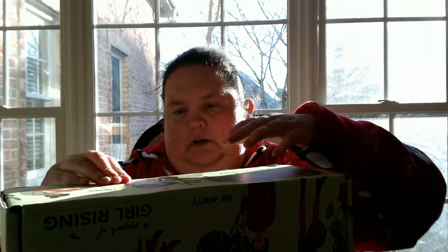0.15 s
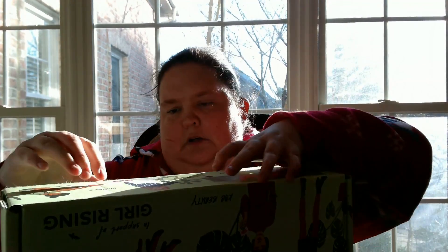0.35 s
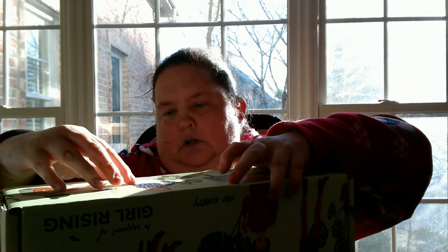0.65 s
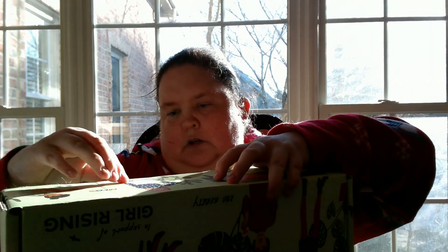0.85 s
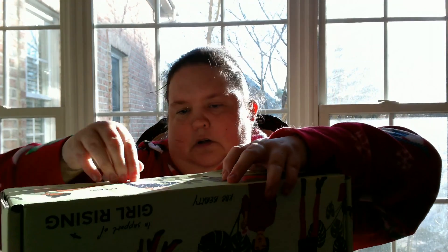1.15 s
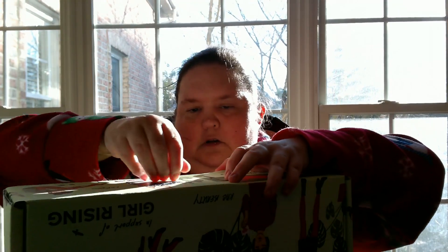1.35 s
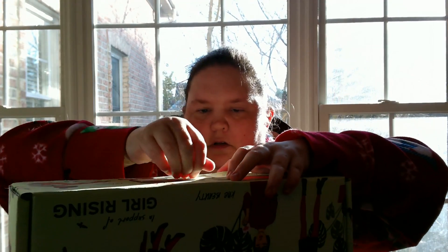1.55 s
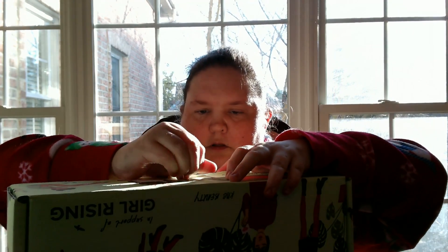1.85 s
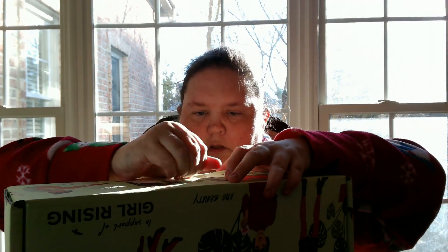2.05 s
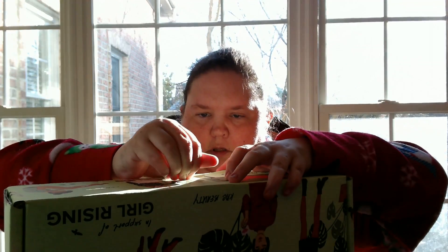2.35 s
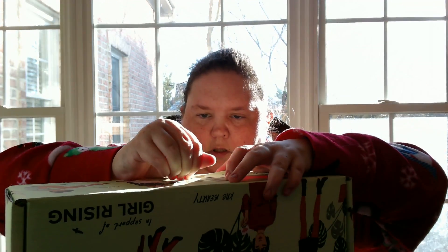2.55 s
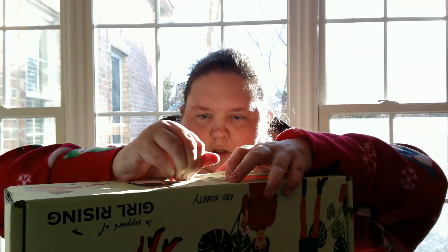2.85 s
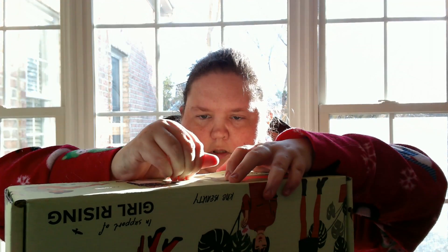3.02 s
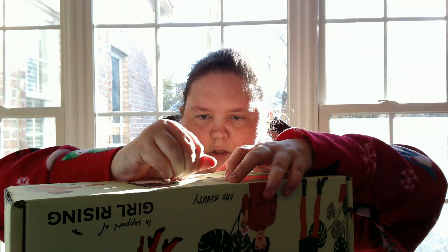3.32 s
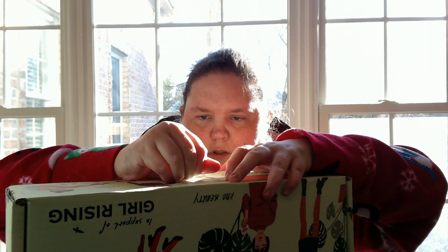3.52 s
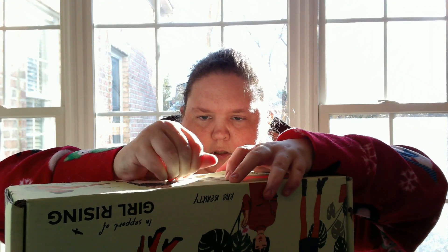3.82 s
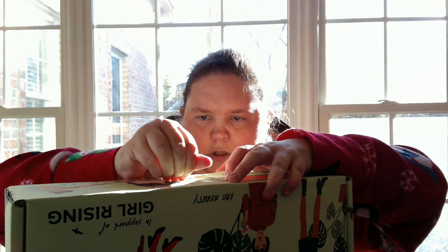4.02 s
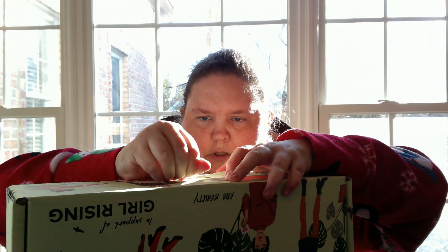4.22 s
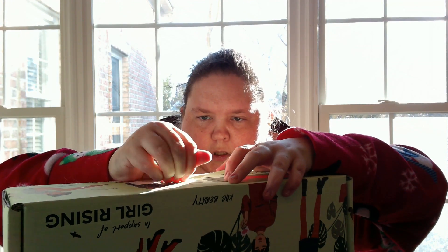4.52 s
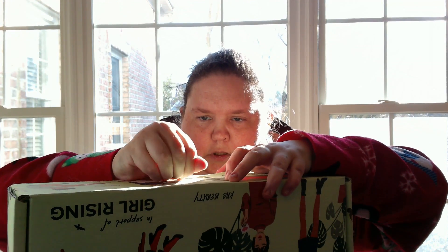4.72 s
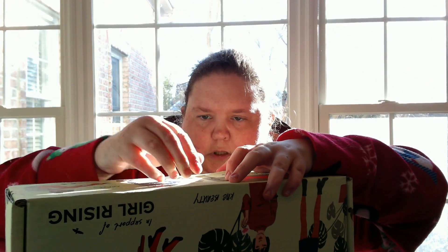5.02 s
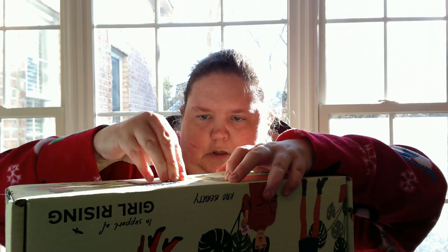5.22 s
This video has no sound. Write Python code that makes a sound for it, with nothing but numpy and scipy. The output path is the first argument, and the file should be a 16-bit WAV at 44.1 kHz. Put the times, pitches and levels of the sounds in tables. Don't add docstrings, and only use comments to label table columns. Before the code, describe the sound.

Hands work at tape on a cardboard carton in a quiet furnished room. Soft dry scrapes come first, then a sharp burst of clicks and snaps, then single hard slips knocking the hollow box, with short scratches between. Low table rumble and faint hiss lie beneath; a distant bird chirps briefly. Close stereo microphone, hands nearer the left side.

```python
import sys
import numpy as np
from scipy import signal
from scipy.fft import rfft, irfft
from scipy.io import wavfile
from scipy.ndimage import uniform_filter1d

SR = 44100
rng = np.random.default_rng(int(sys.argv[2]) if len(sys.argv) > 2 else 0)


def output_pcm(signal):
    pcm = np.clip(np.atleast_2d(signal).T, -1, 1) * 32767
    wavfile.write(sys.argv[1], SR, np.round(pcm).astype(np.int16))


def amplitude_ratio(level_db):
    exponent = np.asarray(level_db, float) / 20
    return 10 ** exponent


N = 237166


def evened(x):
    return x / np.sqrt(np.mean(x ** 2) + 1e-20)


def read(points, hz):
    f, value = np.transpose(points)
    return np.interp(np.log(hz + 1), np.log(f + 1), value)


def curves(rows):
    s, *columns = np.transpose(rows)
    return [np.interp(np.arange(N) / SR, s, c) for c in columns]


def add(mix, s, sound):
    part = mix[..., round(s * SR):][..., :sound.shape[-1]]
    part += sound[..., :part.shape[-1]]


def coloured(x, points):
    gain = amplitude_ratio(read(points, np.fft.rfftfreq(x.shape[-1], 1 / SR)))
    return irfft(rfft(x) * gain, x.shape[-1])


def resonate(x, hz, width_hz):
    turn = np.exp(2j * np.pi * np.cumsum(hz * np.ones(len(x))) / SR)
    r = np.exp(-np.pi * width_hz / SR)
    return 2 * (turn * signal.lfilter([1 - r], [1, -r], x / turn)).real


def flicker(size, depth_db):
    drift = uniform_filter1d(uniform_filter1d(rng.standard_normal(N), size), size)
    return amplitude_ratio(depth_db * evened(drift))


def air():
    # (frequency [Hz], level per Hz [dB])
    tone = [(60, -51), (100, 8.5), (190, -6), (300, -3), (450, -8), (900, -10.5), (1400, -14.5), (2000, -9),
            (2900, -10.5), (3500, -15.5), (4300, -16), (6000, -16), (9000, -20), (16500, -27)]
    # (frequency [Hz], correlation [-1 to 1])
    likeness = [(60, 0.19), (180, 0.93), (550, 0.6), (1650, 0.55), (4970, 0.17), (15000, -0.63)]
    # (frequency [Hz], left over right [dB])
    lean = [(60, 2), (200, -5.5), (450, -4), (900, -5.5), (1500, -7), (2200, -7), (2900, -13), (3800, -3.5),
            (5500, -9.5), (8000, -12.5), (10500, 2.5), (15000, -6)]
    level_db, patch_db = -51.5, 1.22
    frames, hz = N // 256 + 5, np.fft.rfftfreq(1024, 1 / SR)
    a, b, c, d, patches = rng.standard_normal((frames, 513, 5)).T
    patches = uniform_filter1d(patches, size=12, axis=0)
    patches = evened(uniform_filter1d(patches, size=12, axis=1))
    same = np.clip(read(likeness, hz), -1, 1)[:, None]
    left = a + 1j * b
    right = same * left + np.sqrt(1 - same ** 2) * (c + 1j * d)
    z = np.array([left, right]) * amplitude_ratio(read(tone, hz)[:, None] + patch_db * patches)
    z *= amplitude_ratio(np.multiply.outer([.5, -.5], read(lean, hz)))[..., None]
    return amplitude_ratio(level_db) * evened(signal.istft(z, nperseg=1024, noverlap=768)[1][:, :N])


def table():
    # (time [s], sway level [dB])
    weight = [(0.0, -51.5), (0.6, -54), (1.56, -53.5), (1.95, -48.5), (2.25, -53), (2.37, -44.5),
              (2.96, -44.5), (3.5, -49), (3.65, -54), (3.9, -51.5), (4.13, -47), (4.33, -48.5), (4.69, -52),
              (4.91, -53.5), (5.38, -52.5)]
    sway_hz, sway_from_db, rumble_db = 30.6, -56.5, -62
    jolt_s, jolt_db, jolt_hz, jolt_t60_s = 2.322, -21.5, 22.9, 0.17
    sway_db = curves(weight)[0]
    noise = rng.standard_normal((3, N))
    steady = np.sqrt(2) * np.sin(2 * np.pi * sway_hz * np.arange(N) / SR)
    waver = evened(resonate(resonate(noise[0], 21.6, 16), 21.6, 16))
    sway = np.clip((sway_db - sway_from_db) / 9, 0, 1) * steady + 0.57 * waver
    colour = [(35, -25), (55, 18.5), (120, 5), (170, -25.5)]
    rumble = [evened(coloured(noise[1] + 0.5 * side * noise[2], colour)) for side in (1, -1)]
    t = np.maximum(np.arange(N) / SR - jolt_s, 0)
    jolt = -amplitude_ratio(jolt_db - 60 * t / jolt_t60_s) * np.sin(2 * np.pi * jolt_hz * t)
    jolt *= np.minimum(t / 0.02, 1)
    return (jolt + sway * amplitude_ratio(sway_db) + np.array(rumble) * amplitude_ratio(rumble_db)) * amplitude_ratio([[.4], [-.4]])


def bird():
    # (time [s], level [dB])
    trill = [
        (3.95, -68),
        (3.968, -56),
        (3.99, -57),
        (4.028, -47),
        (4.075, -53.5),
        (4.13, -57),
        (4.16, -63),
        (4.27, -67),
    ]
    t = np.arange(N) / SR
    throb = (1 + .7 * np.cos(2 * np.pi * 40.5 * (t - 4.03))) * flicker(size=250, depth_db=2.5)
    sings = (t > trill[0][0]) & (t < trill[-1][0])
    waver_hz = 34 * evened(uniform_filter1d(rng.standard_normal(N), size=300))
    pitch_hz = 3010 - 120 * (t - 4.03) + waver_hz
    whistle = np.sqrt(2) * np.sin(2 * np.pi * np.cumsum(pitch_hz) / SR)
    return amplitude_ratio(curves(trill)[0] - 2.0) * sings * throb * whistle


def room(x):
    # (frequency [Hz], t60 [s])
    decay = [(150, 0.38), (500, 0.16), (2000, 0.24), (6000, 0.2), (10000, 0.19), (15000, 0.28)]
    # (frequency [Hz], likeness [0 to 1])
    likeness = [(100, 0.81), (400, 1), (1000, 0.51), (3000, 0.15)]
    first_wall_db = 5
    taps = np.zeros((2, SR // 2))
    at = np.arange(80, SR // 2 - 20, 20) + rng.integers(0, 20, (2, (SR // 2 - 81) // 20))
    np.put_along_axis(taps, at, rng.choice([-1., 1.], at.shape), 1)
    taps[:, :390] *= amplitude_ratio(-9)
    taps[:, [384, 397, 421]] = amplitude_ratio(first_wall_db) * np.array([1, -.8, .7])
    hz, t, z = signal.stft(taps, SR, nperseg=256)
    same = np.clip(read(likeness, hz), 0, 1)[:, None]
    z = np.array([z[0], same * z[0] + np.sqrt(1 - same ** 2) * z[1]])
    fade = amplitude_ratio(-60 * t / np.maximum(read(decay, hz), .02)[:, None])
    tail = signal.istft(z * fade, SR, nperseg=256)[1]
    tail /= np.linalg.norm(tail, axis=1, keepdims=True)
    return signal.fftconvolve(x[None], tail, axes=1)[:, :N]


def ports(x):
    # (frequency [Hz], loss [dB])
    shadow = [(100, 1.5), (400, 3), (1000, 7), (2000, 10), (3200, 13), (8000, 14), (15000, 17)]
    # (frequency [Hz], delay [samples])
    lag = [(100, 8.9), (400, 14), (1500, 5.1), (5000, 3.4)]
    hz = np.fft.rfftfreq(N, 1 / SR)
    far = amplitude_ratio(-read(shadow, hz)) * np.exp(-2j * np.pi * hz * read(lag, hz) / SR)
    return np.array([x, irfft(rfft(x) * far, N)])


def pressure():
    # (time [s], length [ms], hiss level [dB], press level [dB])
    strokes = [(0.005, 35, -55.5, -53.5), (1.082, 29, -56, -54), (1.462, 35.6, -45, -49),
               (1.54, 28, -50, -49), (1.706, 6.6, -58, -50), (2.175, 23, -56, -57.5),
               (2.325, 28, -56.5, -58), (2.386, 28, -52, -48), (2.444, 22, -55.5, -53),
               (2.81, 25, -52, -56), (2.911, 32, -60, -58), (3.028, 14, -60, -63),
               (3.302, 99, -63.5, -62.5), (3.542, 140, -73, -61), (3.961, 23, -54.5, -52),
               (4.081, 26, -67, -59.5), (4.462, 37, -48.5, -53), (4.555, 26, -56, -53),
               (4.59, 34, -45.5, -50), (4.626, 13, -52, -50.5), (4.64, 7, -43, -44),
               (4.655, 20, -56, -52.5), (4.977, 67, -62, -71), (5.073, 27, -47.5, -58),
               (5.271, 33, -63, -60.5)]
    # (time [s], length [ms], hiss level [dB])
    brushes = [(0.156, 48, -52), (0.25, 25, -53), (0.275, 34, -48), (0.32, 20, -52), (0.342, 32, -55),
               (0.5, 77, -56), (0.578, 71, -53.5), (0.686, 23, -55), (0.814, 24, -52), (0.975, 35, -52),
               (1.165, 43, -52.5), (1.201, 82, -51.5), (1.325, 91, -54), (1.65, 13, -53),
               (3.843, 23, -47.5), (4.73, 17, -60), (4.855, 11, -42.5), (5.154, 61, -50.5)]
    # (time [s], glide level [dB], press level [dB])
    rest = [(0.0, -56.5, -50.5), (0.96, -57, -56.5), (1.18, -61.5, -56), (1.35, -49.5, -47),
            (1.42, -52.5, -45.5), (1.62, -64, -49), (1.78, -66, -61), (1.95, -67, -42), (2.07, -59, -49),
            (2.5, -68, -54), (2.73, -63, -72), (2.86, -66, -44.5), (3.38, -71, -63), (3.86, -60.5, -47.5),
            (4.04, -67, -61.5), (4.31, -66, -49), (4.49, -63, -49.5), (5.38, -63.5, -54)]
    brush_hiss_db, brush_press_db, brush_airy_db = -0.5, -21.5, -1
    scratch_share, scratch_db, buzz_db, drone_db = 0.59, -4, 2, 3.5
    touches = [(*row, row[2] - 9.0) for row in strokes]
    for s, length_ms, db in brushes:
        touches.append((s, length_ms, db + brush_hiss_db, db + brush_press_db, db + brush_airy_db))
    power, ms = np.zeros((5, N)), np.arange(8000) * 1000 / SR
    for s, length_ms, hiss_db, press_db, airy_db in touches:
        mixed_db = scratch_db + scratch_share * press_db + (1 - scratch_share) * hiss_db
        levels_db = np.array([hiss_db, mixed_db, press_db + buzz_db, press_db + drone_db, airy_db])
        edge_ms = 2.2 + 0.1 * length_ms
        fade = np.exp(-np.maximum(ms - 4.0 - 0.92 * length_ms, 0) / edge_ms)
        shape = np.clip(ms / edge_ms, 0, 1) * fade
        add(power, max(s - .004, 0), amplitude_ratio(levels_db)[:, None] ** 2 * shape ** 2)
    glide, press = curves(rest)
    creep_db = np.array([glide - 1.5, glide - 11.5, press - 11.0, press - 8.5, glide - 3.5])
    return np.sqrt(power + amplitude_ratio(creep_db) ** 2)


def rubbing():
    # (frequency [Hz], level per Hz [dB])
    hiss_colour = [(3530, -8.5), (6000, -6.5), (8970, -3), (12000, -1), (14500, 1), (15800, 3.5),
                   (16200, -22), (16500, -26)]
    # (frequency [Hz], level per Hz [dB])
    airy_colour = [(9000, -34), (12000, -4), (13500, 2), (15500, 5), (16200, -18)]
    # (frequency [Hz], width [Hz], level [dB])
    skin = [(510, 25, 5.5), (836, 59, 1), (1056, 57, -9.5), (1680, 98, 2), (2880, 150, -10),
            (3680, 39, -39), (3940, 39, -14)]
    # (frequency [Hz], width [Hz], level [dB])
    hollow = [(248, 47, 0.5), (314, 60, 0.5), (429, 135, -7), (570, 50, -23)]
    scratch_colour = [(2200, -42), (3500, -2.0), (5500, 6.0), (8000, 4.0), (10000, -5.5), (14000, -13)]
    slips = rng.standard_normal((4, N)) * amplitude_ratio(np.minimum(rng.exponential(1, N), 5))
    hiss = evened(coloured(slips[0], hiss_colour)) * amplitude_ratio(4.5)
    scratch = evened(coloured(slips[1], scratch_colour)) * amplitude_ratio(1.5)
    airy = evened(coloured(slips[1], airy_colour))
    buzz = sum(amplitude_ratio(db) * resonate(slips[2], hz, 1.34 * w) for hz, w, db in skin)
    buzz = evened(buzz + amplitude_ratio(6.5) * resonate(slips[2], 1170, 780)) * amplitude_ratio(-2.5)
    drone = sum(amplitude_ratio(db) * resonate(resonate(slips[3], hz, w), hz, 2.1 * w) for hz, w, db in hollow)
    drone = evened(drone) * amplitude_ratio(0.5)
    drone *= flicker(size=350, depth_db=1.8)
    buzz *= flicker(size=120, depth_db=2.2)
    grip = flicker(size=150, depth_db=.8)
    return grip * (pressure() * [hiss, scratch, buzz, drone, airy]).sum(0)


def knocks():
    # (time [s], knock level [dB], deep push level [dB], contact [ms])
    drops = [(1.0861, -28, -53, 4), (1.5307, -33.5, -51, 0.55), (1.7142, -34.5, -61, 0.47),
             (1.839, -23, -63, 0.66), (1.8536, -32, -39, 0.8), (1.9367, -32, -56, 0.55),
             (2.0304, -29.5, -61, 0.47), (2.069, -27, -71, 0.96), (2.0851, -25.5, -52, 0.69),
             (2.3903, -50, -42, 0.6), (2.649, -25, -61, 1.42), (2.6701, -20, -39.5, 1.27),
             (3.1521, -18.5, -39, 1.8), (3.6812, -18, -31.5, 2.9), (3.6878, -26, -26.5, 2.2),
             (3.7079, -20.5, -33.5, 1.58), (4.2889, -15.5, -44, 1.72), (4.3094, -48, -30.5, 0.83),
             (4.8504, -22, -33.5, 1.72), (4.855, -17.5, -34.5, 1.53)]
    # (time [s], knock level [dB])
    nudges = [(0.252, -45.5), (0.42, -45), (1.235, -41.5), (1.2414, -51), (1.281, -42), (1.2918, -40.5),
              (1.304, -42), (1.358, -58), (1.408, -43), (1.426, -45), (1.448, -48), (1.479, -47),
              (1.504, -41), (1.5555, -35.5), (1.568, -45), (1.58, -40), (2.34, -44), (2.351, -45),
              (2.411, -49), (2.4524, -37.5), (2.517, -46), (2.5237, -43), (2.883, -50), (2.917, -46.5),
              (2.926, -55), (2.987, -43.5), (3.033, -38), (3.042, -43.5), (3.945, -41), (3.954, -36),
              (3.9833, -34.5), (4.3209, -35), (4.593, -47), (4.631, -47)]
    nudge_deep_db, nudge_ms = -25, 0.69
    cavity_hz, sag_hz_per_ms = 297.6, 3.8
    hits = list(drops) + [(s, db, db + nudge_deep_db, nudge_ms) for s, db in nudges]
    out, t = np.zeros(N), np.arange(4000) / SR
    for s, knock_db, deep_db, contact_ms in hits:
        hz = cavity_hz - sag_hz_per_ms * contact_ms
        body = amplitude_ratio(-60 * t / 0.037) * np.cos(2 * np.pi * hz * t)
        body += 0.31 * amplitude_ratio(-60 * t / 0.024) * np.cos(2 * np.pi * 0.794 * hz * t)
        body += 0.25 * amplitude_ratio(-60 * t / 0.023) * np.cos(2 * np.pi * 1.61 * hz * t)
        deep = amplitude_ratio(deep_db + 5.5 - 60 * t / 0.1) * np.sin(2 * np.pi * 85 * t)
        push = np.sin(np.pi * np.clip(t[:200] * 1000 / (contact_ms + 0.1), 0, 1)) ** 2
        add(out, s, np.convolve(amplitude_ratio(knock_db + 3.5) * body + deep, push / push.sum()))
    return out


def snaps():
    # (time [s], snap level [dB], lid ring level [dB], crackle t60 [ms], snap centre [kHz])
    tape_slips = [(1.8395, -33, -30, 4, 15), (1.8422, -33, -44, 6.6, 6.4), (1.9208, -17, -37, 2, 8.9),
                  (1.922, -23, -46, 1.3, 8.7), (1.9285, -19, -37, 1.8, 10), (1.9292, -22, -38.5, 2.5, 10),
                  (1.9343, -18, -27.5, 5.9, 8.1), (1.937, -19, -28, 2.2, 8.8), (2.0309, -13, -21, 3.6, 6.7),
                  (2.0682, -17.5, -40, 7.2, 5.7), (2.0683, -15.5, -24, 8, 12), (2.0713, -24, -32, 5, 8.3),
                  (2.0829, -14, -31, 1.7, 10), (2.0857, -3.5, -11, 1.5, 6.8), (2.0875, -19, -43, 8, 7.9),
                  (2.0947, -29, -30, 9, 6.1), (2.097, -21, -56, 8, 13), (2.6709, -9, -10, 2.1, 8.7),
                  (3.1532, -26.5, -35.5, 1.2, 8.5), (3.6826, -31, -29.5, 5, 13),
                  (3.6859, -18.5, -38, 4, 8.4), (3.7087, -10.5, -16, 5.3, 4.5),
                  (4.2894, -27, -26.5, 5.4, 5.5), (4.3101, -30, -32, 8, 6.1), (4.312, -35, -53, 8.7, 11),
                  (4.322, -32, -50, 8, 13), (4.3248, -32, -45, 4, 11), (4.8465, -44, -60, 8, 10),
                  (4.849, -33, -49, 4.4, 9.6), (4.8508, -25, -26, 4.6, 6.2), (4.8556, -37, -27.5, 9, 11)]
    # (time [s], snap level [dB], lid ring level [dB], snap centre [kHz])
    ticks = [(0.1814, -31, -48, 9.6), (0.1905, -33, -55, 10.1), (0.348, -37, -61, 14),
             (1.018, -30, -61, 7.5), (1.0864, -29, -64, 15), (1.097, -44, -72, 13.5),
             (1.306, -35, -46, 7.6), (0.374, -39, -63, 13), (0.414, -38, -63, 7.8),
             (1.652, -44, -43.5, 10.5), (1.676, -46, -51, 10.5), (1.7128, -41, -33.5, 17),
             (2.1784, -24.5, -45, 6), (2.2327, -31.5, -48, 8.9), (2.388, -44, -36.5, 11),
             (2.5684, -30, -60, 7.7), (2.6495, -34, -30, 9.3), (2.811, -40, -41, 17),
             (3.6737, -41, -51, 13.3), (3.845, -25, -46, 8.5), (4.2805, -42, -55, 11),
             (4.2897, -17.5, -48, 10.5), (4.8512, -23, -45, 11.5), (1.2354, -60, -44, 10),
             (1.407, -60, -45, 10), (1.449, -60, -42, 10), (1.529, -60, -48, 10), (2.884, -60, -43, 10),
             (3.033, -60, -47, 10), (4.5945, -55, -33, 10), (4.612, -55, -47, 10), (4.646, -55, -40, 10),
             (4.663, -55, -49, 10), (5.067, -42, -42, 13), (5.088, -27, -68, 15)]
    # (frequency [Hz], level [dB])
    snap_colour = [(1500, -16), (2800, -19), (4100, 4), (5200, 5.5), (7500, 3), (10000, 7), (12500, 5.5),
                   (15000, 7.5), (16000, 6), (17200, -3)]
    # (frequency [Hz], level [dB], t60 [s])
    lid = [(632, 10.5, 0.028), (910, 2, 0.015), (1120, 4, 0.017), (1350, -4, 0.011), (1747, 0, 0.021),
           (1900, 1, 0.013), (2320, -0.5, 0.0091), (3150, -11, 0.017), (3650, -14.5, 0.021)]
    blur = np.array([[1], [2.5]])
    snap_focus, tick_focus = (12, 0.27), (23, 0.094)  # (dB lost per octave squared, broad share)
    tick_t60_ms, ring_scatter_db = 6.6, 1.5
    soft_khz, soft_db, db_per_octave = 1.343, -33.5, 17
    slips = [(*row, *snap_focus) for row in tape_slips]
    slips += [(s, db, ring_db, tick_t60_ms, centre, *tick_focus) for s, db, ring_db, centre in ticks]
    treble, ring, t = np.zeros((3, N)), np.zeros((2, N)), np.arange(1024) / SR
    khz = np.fft.rfftfreq(len(t), 1000 / SR) + .1
    chance = rng.standard_normal((80, 3, len(t)))
    for slip, (near, other, tune) in zip(slips, chance):
        s, snap_db, ring_db, t60_ms, snap_khz, focus_db, broad = slip
        burst = amplitude_ratio(-60 * t / (t60_ms / 1000 + 1e-4)) * np.array([near, .8 * near + .6 * other])
        burst[:, :3] += [1.1, -1.5, .6]
        burst = np.vstack([burst, (t == 0) * np.linalg.norm(burst[0])])
        favour = amplitude_ratio(-focus_db * np.log2(khz / snap_khz) ** 2) + broad
        z = rfft(np.roll(burst, shift=64, axis=1))
        power = abs(z) ** 2
        lumps = np.sqrt(uniform_filter1d(power, size=36, axis=1) / np.mean(power, axis=1, keepdims=True))
        rise = np.sqrt(2) * np.sin(khz * np.pi / 44.1)
        burst = irfft(z * favour * rise / (lumps + .05))
        add(treble, s - 70 / SR, amplitude_ratio(snap_db) * burst * amplitude_ratio([[0], [-17], [0]]))

        ring_khz = soft_khz * 2 ** (max(ring_db - soft_db, 0) / db_per_octave)
        for k, (hz, db, t60) in enumerate(lid):
            reach_db = db + ring_scatter_db * tune[k] - 5.1 * np.log2(hz / 1000 / ring_khz) ** 2
            fade = amplitude_ratio(ring_db - 5.5 + reach_db - 60 * t / t60 * blur) * np.sqrt(blur)
            mode = np.sin(2 * np.pi * hz * (1 + 0.041 * tune[9 + k]) * t)
            add(ring, s - .0003, fade * mode)
    treble[1] = np.roll(treble[1], shift=3)
    return coloured(treble, snap_colour), ring


def scene():
    treble, ring = snaps()
    knock, rub = knocks(), rubbing()
    wet = amplitude_ratio(-3.5) * treble[2] + amplitude_ratio(-9.5) * ring[1] + amplitude_ratio(-7.0) * knock + amplitude_ratio(-5.5) * rub
    walls = coloured(room(wet), [(100, -11.5), (1000, 4.0), (5000, -5.0), (9000, -8.5), (15000, -15.5)])
    background = table() + air() + bird() * amplitude_ratio([[.4], [-.4]])
    return treble[:2] + ports(ring[0] + knock + rub) + walls + background


def band_limit(x):
    return signal.sosfilt(signal.butter(12, 16960, fs=SR, output="sos"), x)


def record(dry):
    held = np.clip(dry, -.95, .95)
    limited = coloured(held, [(15750, 0.0), (15950, -14), (16800, -13), (17000, -83)])
    return band_limit(limited)


dry = scene()
out = record(dry)
output_pcm(out)
```